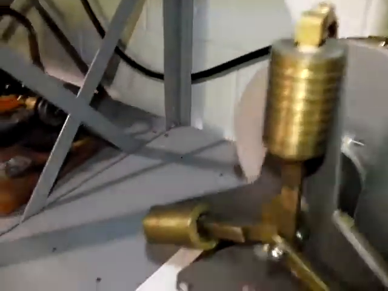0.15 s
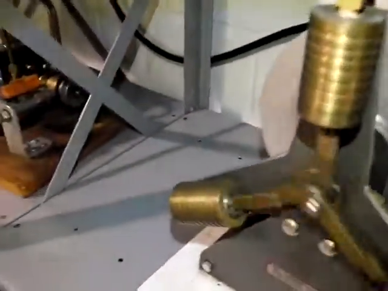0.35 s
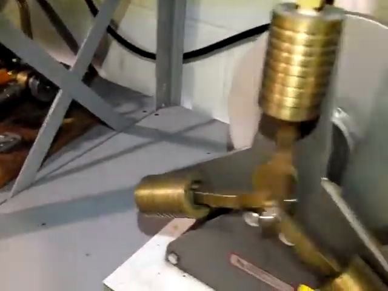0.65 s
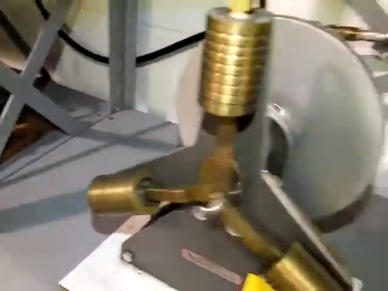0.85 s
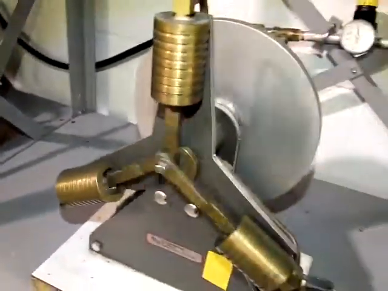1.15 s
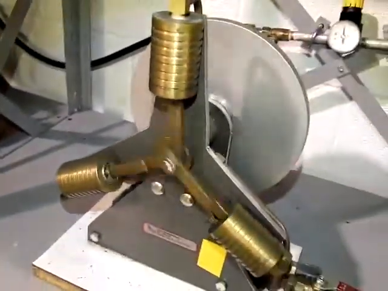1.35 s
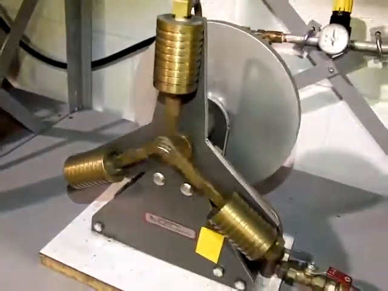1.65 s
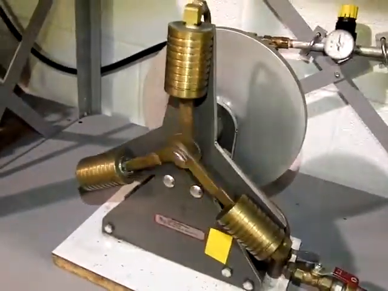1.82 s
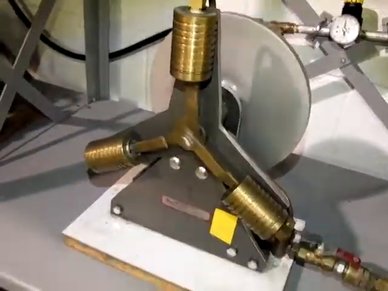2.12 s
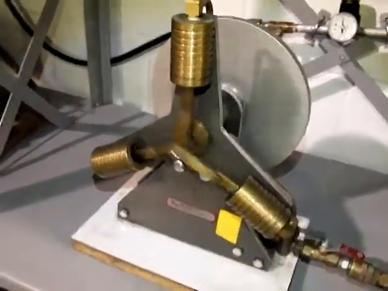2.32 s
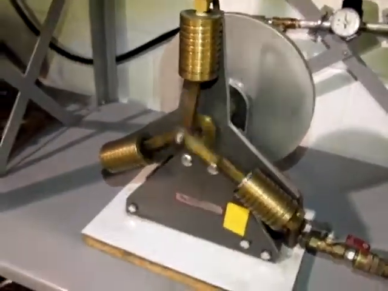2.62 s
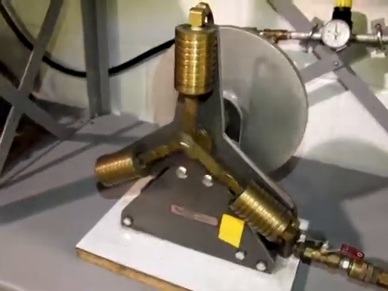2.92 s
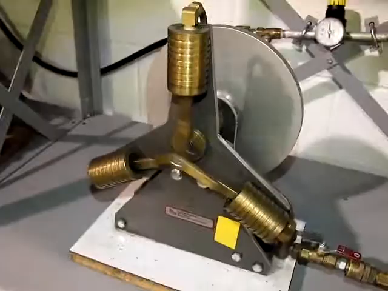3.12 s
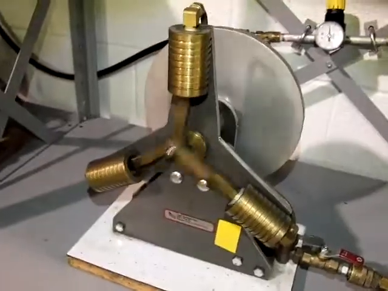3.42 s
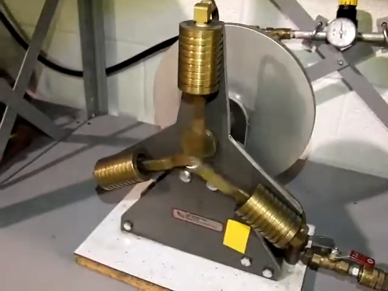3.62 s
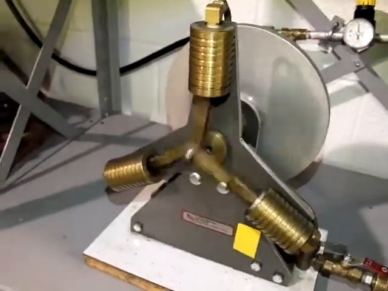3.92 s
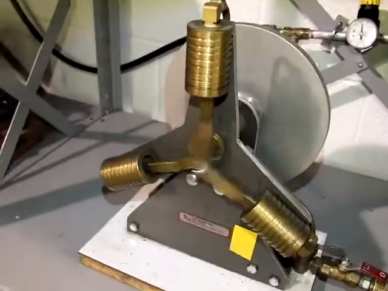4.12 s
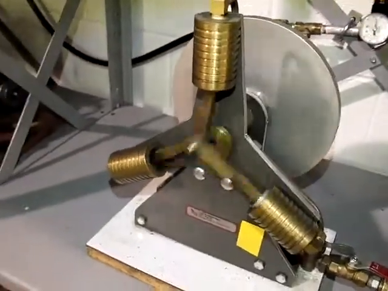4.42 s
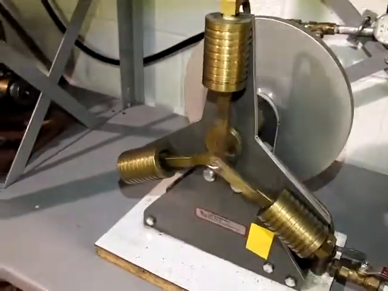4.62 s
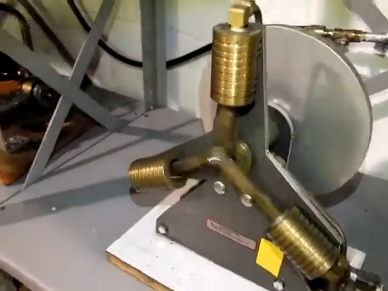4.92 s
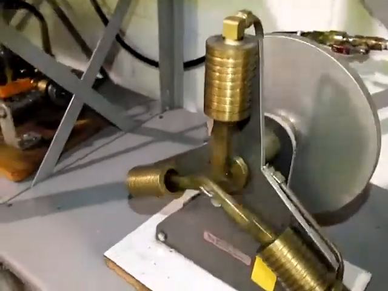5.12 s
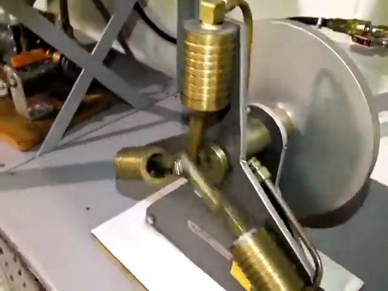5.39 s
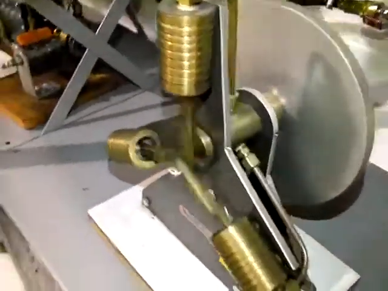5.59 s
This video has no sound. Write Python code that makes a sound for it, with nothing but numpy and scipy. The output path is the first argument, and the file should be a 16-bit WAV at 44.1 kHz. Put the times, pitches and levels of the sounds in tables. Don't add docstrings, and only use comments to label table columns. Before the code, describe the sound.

Close by, pressurised air bursts from a little engine in crisp, slightly tonal puffs, about four a second at first and eight a second by the end. Small spitting jets and leaking air fill the gaps. A short high whistle marks the start, a quick clattering knock comes midway, and an uneven low rumble strengthens later. Faint workshop hum sits behind; the handheld stereo microphone gives a bright, diffuse, phasey treble.

```python
import sys
import numpy as np
from scipy import signal
from scipy.fft import rfft, irfft, next_fast_len
from scipy.io import wavfile
from scipy.ndimage import uniform_filter1d, map_coordinates

SR = 44100
rng = np.random.default_rng(int(sys.argv[2]) if len(sys.argv) > 2 else 0)


def volts_from_db(level):
    exponent = np.asarray(level, float) / 20
    return 10 ** exponent


def file_out(sig):
    cols = np.atleast_2d(sig).T
    lim = np.clip(cols, -1, 1)
    pcm = np.round(lim * 32767).astype(np.int16)
    wavfile.write(sys.argv[1], SR, pcm)


N = 253575


def seconds():
    return np.arange(N) / SR


def tone(pitch_hz):
    return np.sin(2 * np.pi * np.cumsum(pitch_hz) / SR)


def unit(x):
    return x / np.sqrt(np.mean(x ** 2) + 1e-20)


def along(points, hz):
    f, v = np.transpose(points)
    return np.interp(np.log(hz + 1), np.log(f + 1), v)


def curves(rows):
    s, *cols = np.transpose(rows)
    return [np.interp(seconds(), s, c) for c in cols]


def wobble(rate):
    knots = rng.standard_normal(int(N * rate / SR) + 4)
    return map_coordinates(knots, [np.arange(N) * rate / SR])


def filtered(x, response):
    m = next_fast_len(N + SR // 2)
    return irfft(rfft(x, m) * response(np.fft.rfftfreq(m, 1 / SR)), m)[..., :N]


def peak(f, hz, width):
    return 1j * f * width / (hz * hz - f * f + 1j * f * width)


def swell(age, rise, fall):
    age = np.maximum(age, 0)
    return (1 - np.exp(-age / abs(rise))) ** 2 * np.exp(-age / abs(fall))


# pitch_hz, likeness (0-1)
LIKENESS = [(60, 1), (300, 0.87), (700, 0.79), (1500, 0.75), (2500, 0.62), (4000, 0.81), (8000, 0.89),
            (14000, 0.89)]


def noise(gain):
    def mid_and_side(f):
        turn = np.arccos(np.clip(along(LIKENESS, f), 0, 1)) / 2
        return gain(f) * [np.cos(turn), np.sin(turn)]

    mid, side = filtered(rng.standard_normal((2, N)), mid_and_side)
    return unit(np.array([mid + side, mid - side]))


# start_s, peak_db, port_band_db, cylinder_band_db, port_pitch_hz
MAIN_PUFFS = [(0.2301, -16.5, -4.5, -5, 1539), (0.4972, -15, -5.5, -3, 1491),
              (0.7253, -13.5, -3.5, -7, 1686), (0.9268, -17, 0, 0.5, 1323), (1.1154, -19, 0.5, -0.5, 1478),
              (1.2903, -19, 0, 0, 1378), (1.4572, -19, -2, -0.5, 1508), (1.6182, -20.5, 1, 0, 1530),
              (1.7717, -19, 1.5, -5.5, 1870), (1.924, -17, -1.5, -3.5, 1415), (2.0719, -18.5, -3, -3, 1390),
              (2.2154, -16.5, 0.5, -5, 1818), (2.3555, -21, 3, -2, 1520), (2.4938, -20, 1, 0, 1520),
              (2.6328, -19.5, 1.5, -1, 1741), (2.7676, -16, -2.5, -4.5, 1530), (2.8992, -20.5, 2, 2, 1422),
              (3.0319, -19, 0.5, -1.5, 1390), (3.163, -17.5, -1.5, 0, 1970), (3.2929, -17.5, 0, -1, 1520),
              (3.4222, -17.5, 1.5, -1, 1540), (3.5503, -17, -0.5, 0.5, 1430),
              (3.6768, -16.5, -1, -1.5, 1508), (3.8044, -15, -2.5, -4.5, 1508),
              (3.929, -17.5, 1.5, -1.5, 1504), (4.0561, -17.5, -0.5, -0.5, 1404),
              (4.181, -14.5, -5, -3.5, 1850), (4.3043, -18, 1.5, -1, 1532), (4.4278, -19, 1.5, 1, 1682),
              (4.5515, -16, -1, -1, 1870), (4.6748, -15, -3.5, -4, 1370), (4.7944, -16.5, -2, -3.5, 1510),
              (4.9187, -19.5, 1.5, 0.5, 1360), (5.0409, -16, -6, -4.5, 1520),
              (5.1622, -16.5, -9.5, -4, 1354), (5.2829, -15.5, -4, -5.5, 1383),
              (5.4052, -18.5, -1, -0.5, 1560), (5.5273, -14.5, -1, -3, 1416), (5.6481, -16, -4, -0.5, 1548)]
OUTER_PUFFS = (-0.11, 5.767)


def crank():
    times = np.concatenate([OUTER_PUFFS[:1], np.array(MAIN_PUFFS)[:, 0], OUTER_PUFFS[1:]])
    return np.interp(seconds(), times, np.arange(len(times)))


def nearest_puff(angle):
    return np.clip(np.round(angle).astype(int), 1, len(MAIN_PUFFS))


# delay_turns, rise_turns, fall_turns, gain_db
PUFF_SHAPES = [
    (-0.012, .03, .02, 22),
    (-0.0074, 0.031, 0.026, 21.5),
    (-0.02, 0.026, 0.023, 14.5),
    (-0.019, .028, 0.021, 22.5),
    (0.0072, 0.037, 0.024, 19.5),
]


def main_puffs(angle):
    _, peak_db, port_db, cylinder_db, _ = np.transpose(MAIN_PUFFS)
    parts_db = peak_db + np.array([port_db, cylinder_db, 0 * peak_db, 0 * peak_db, cylinder_db])
    nearest = nearest_puff(angle)
    return np.array([volts_from_db(db[nearest - 1] + gain_db) * swell(angle - nearest - delay, rise, fall)
                     for db, (delay, rise, fall, gain_db) in zip(parts_db, PUFF_SHAPES)])


# start_s, peak_db, port_band_db, cylinder_band_db
SLOW_PUFFS = [
    (0.051, -33, -20, -11.5),
    (0.1164, -32, 1.5, 3),
    (0.413, -29.5, -3.5, -4),
    (0.651, -31.5, -6, -3),
]


def slow_puffs():
    power = np.zeros((4, N))
    for s, db, port_db, cylinder_db in SLOW_PUFFS:
        band_db = np.array([[port_db], [cylinder_db], [-9], [0]])
        power += (volts_from_db(db + 16.5 + band_db) * swell(seconds() - s + .002, 0.0054, 0.0071)) ** 2
    return power


# angle_turns, rise_turns, fall_turns,
# port_db, cylinder_db, hiss_db, jet_db, pipe_note_db
VALVE_PUFFS = [
    (0.038, 0.046, 0.18, -28, -27, -36, -28, -44),
    (.17, 0.024, 0.012, -39, -39, -41, -27, -50),
    (0.419, 0.019, 0.078, -28.5, -48.5, -51, -43, -27.5),
    (.645, 0.013, 0.0216, -54, -37, -34, -24, -50),
    (0.788, 0.024, 0.033, -25.5, -24.5, -36, -27, -50),
    (.87, 0.066, 0.24, -33, -39.5, -44, -39.5, -50),
]
# time_s, level_db, jet_db
AIR_PRESSURE = [(0.0, -5, -1), (5.75, 1.5, 0.5)]
# port_db, cylinder_db, hiss_db, jet_db, pipe_note_db
STEADY_LEAK = (-44, -43.5, -50, -44.5, -49)


def leak_and_valve_puffs(angle):
    level_db, jet_db = curves(AIR_PRESSURE)
    pressure_db = level_db + jet_db * np.array([[0], [0], [1], [1], [0]])
    power = volts_from_db(np.array(STEADY_LEAK)[:, None] + pressure_db + 2.0 * wobble(25)) ** 2
    for at, rise, fall, *band_db in VALVE_PUFFS:
        turn, part = np.divmod(angle - at + 1, 1)
        scatter_db = 2.6 * rng.standard_normal((len(MAIN_PUFFS) + 3, len(band_db)))
        puff_db = np.array(band_db)[:, None] + scatter_db[turn.astype(int)].T + pressure_db + 5
        power += (volts_from_db(puff_db) * swell(part, rise, fall)) ** 2
    return power


# pitch_hz, level_db per Hz
AIR_COLOUR = [(700, -24), (1100, -13.5), (1500, -4.5), (2300, -4.5), (2850, -9), (3500, -1), (4400, -6.5),
              (5300, -15), (7000, -19), (9200, -17), (10700, -3.5), (11600, -9.5), (13000, -14),
              (15600, -19.5)]
BAND_SPLITS = (2910, 5560, 8900, 12670)
# pitch_hz, width_hz, boost_db
BRASS_RINGS = [(1370, 83, 4.5), (1521, 91, 5), (2400, 170, 2), (3515, 69, 3), (4190, 68, 5), (4730, 130, 7),
               (5140, 90, 9), (8120, 360, 5), (10180, 220, 4), (10810, 190, 3.5), (11500, 140, 5)]


def engine(angle):
    burst = main_puffs(angle)
    power = leak_and_valve_puffs(angle)
    power[:-1] += burst[:-1] ** 2 + slow_puffs()

    def air_bands(f):
        low1, low2, low3, low4 = [1 / (1 + (f / hz) ** 16) for hz in BAND_SPLITS]
        jet = low4 - low3
        return low1, low2 - low1, 1 - low2 - jet, jet

    air = np.zeros((2, N))
    for band in range(4):
        air += np.sqrt(power[band]) * noise(lambda f: volts_from_db(along(AIR_COLOUR, f)) * air_bands(f)[band])
    air += np.sqrt(power[-1]) * noise(lambda f: peak(f, 1940, 93) ** 2)
    air += burst[-1] * noise(lambda f: peak(f, 3418, 250) ** 2)
    port_hz = np.array(MAIN_PUFFS)[nearest_puff(angle) - 1, 4]
    air += volts_from_db(-1.5) * burst[0] * tone(port_hz)

    def brass(f):
        return 1 + sum((volts_from_db(db) - 1) * peak(f, hz, w) for hz, w, db in BRASS_RINGS)

    return volts_from_db(-2.5) * filtered(air, brass)


# time_s, low_db, middle_db, high_db, room_db
RUMBLE_AND_ROOM = [(0.0, -36, -44, -51, -49.5), (0.17, -54.5, -56, -51, -42.5), (0.26, -63, -57, -64, -51),
                   (0.42, -40.5, -41, -46, -44.5), (0.56, -55, -51, -56, -53.5),
                   (0.66, -40.5, -46, -55.5, -46), (0.75, -50, -52, -54, -50.5),
                   (0.85, -48, -49, -46.5, -46.5), (1.06, -58, -53, -55, -48), (1.17, -56, -61, -51, -49),
                   (1.65, -52, -58, -56, -48), (1.75, -55, -49, -53, -48), (2.05, -48, -54, -51.5, -46),
                   (2.21, -63, -60, -54, -46.5), (2.39, -48, -51.5, -53, -45.5), (2.58, -53, -51, -55, -45),
                   (2.67, -61, -51, -47.5, -47), (2.98, -45, -58, -41, -45.5), (3.41, -58, -42, -46, -42.5),
                   (3.54, -49, -45, -51, -41), (3.73, -45, -45.5, -47, -41.5), (4.21, -43, -45, -50.5, -44),
                   (4.36, -40, -41.5, -45, -44.5), (4.61, -49, -43.5, -44, -42.5),
                   (4.76, -43, -41.5, -51, -43.5), (5.06, -52, -39.5, -48, -43.5),
                   (5.75, -44, -35, -43, -42)]
# pitch_hz, width_hz
BENCH_SHAKES = [
    (72, 18),
    (98.5, 13.6),
    (121.5, 13.5),
]


def bench(angle):
    smooth = uniform_filter1d(angle, size=SR // 8, mode="nearest")
    orders = np.arange(6, 24)
    sizes = volts_from_db(7.5 * (orders % 3 == 0))
    shake = np.zeros(N)
    for order, size, phase in zip(orders, sizes, rng.random(len(orders))):
        shake += size * np.sin(2 * np.pi * (order * smooth + phase))
    shake = unit(shake) + 0.27 * rng.standard_normal(N) * np.sqrt(SR / 400)
    return sum(volts_from_db(db) * unit(filtered(shake, lambda f: peak(f, hz, width) ** 2))
               for db, (hz, width) in zip(curves(RUMBLE_AND_ROOM), BENCH_SHAKES))


# time_s, level_db
WHISTLE_LEVEL = [(0, -80), (.018, -72), (.026, -27.5), (.06, -38), (.1, -43), (.16, -37), (.25, -59)]


def whistle():
    pitch_hz = 3480 + 8 * wobble(55)
    return volts_from_db(curves(WHISTLE_LEVEL)[0] + 5.5 + 1.5 * wobble(82)) * tone(pitch_hz)


# start_s, peak_db, pitch_hz
KNOCKS = [
    (2.6627, -16, 2000),
    (2.669, -18.5, 565),
    (2.676, -20, 1020),
    (2.681, -19, 2130),
]
# pitch_hz, level_db per Hz
SCRAPE_COLOUR = [(120, -45), (200, -10), (1030, -3.5), (1540, -20), (2010, 2.5), (2520, -2.5), (2900, -21),
                 (3520, -8), (9000, -35), (11700, -70), (19800, -120)]


def rattle():
    t = seconds()
    scrape = noise(lambda f: volts_from_db(along(SCRAPE_COLOUR, f)))
    knocks = volts_from_db(-23) * swell(t - KNOCKS[0][0], 0.01, 0.023) * scrape
    for s, db, hz in KNOCKS:
        ring = 0.77 * np.sin(2 * np.pi * hz * (t - s))
        knocks += volts_from_db(db + 5) * swell(t - s + 0.00057, 0.00064, 0.0026) * (scrape + ring)
    return knocks


# pitch_hz, level_db per Hz
ROOM_COLOUR = [(12, -38), (20, -4), (102, 4), (205, -8.5), (307, -7), (356, -7.5), (412, -13.5),
               (513, -8.5), (688, -8.5), (940, -12.5), (1220, -14.5), (1360, -3), (1600, -10), (2080, -48),
               (3520, -120)]
# pitch_hz, width_hz, boost_db
ROOM_BOOSTS = [(305, 12.6, 3.5), (520, 70, 6), (668.3, 18, 9.5), (798, 55, 7.5)]
# pitch_hz, level_db
MAINS_HUM = [(360.7, -51)]


def workshop():
    def colour(f):
        boosts = 1 + sum((volts_from_db(db) - 1) * abs(peak(f, hz, w)) ** 2 for hz, w, db in ROOM_BOOSTS)
        return volts_from_db(along(ROOM_COLOUR, f)) * boosts

    room = volts_from_db(curves(RUMBLE_AND_ROOM)[-1] + 4.5 + 1.42 * wobble(12)) * noise(colour)
    hum_hz, hum_db = MAINS_HUM[0]
    hum = volts_from_db(hum_db + 3 + 1.1 * wobble(6.8)) * np.sin(2 * np.pi * hum_hz * seconds())
    return room + hum


def scene():
    angle = crank()
    return engine(angle) + bench(angle) + whistle() + rattle() + workshop()


def band_limit(x):
    return signal.sosfilt(signal.butter(12, 15820, fs=SR, output="sos"), x)


# pitch_hz, lead_radians
PORT_LEAD = [(0, -0.5), (600, -0.66), (1210, -1.47), (1460, -0.9), (2070, -2.5), (3270, -2.5), (4050, -3),
             (4390, -2.5), (6200, -2.5), (8180, -2.5), (8530, -2.5), (11300, -3), (12200, -2.5),
             (15400, -2.5)]
# pitch_hz, difference_db
PORT_TILT = [(60, -1.5), (110, 0.5), (200, 0.5), (380, 0.5), (700, 1.0), (1290, 1), (2380, -4), (4400, 0),
             (8120, -3.5), (15000, 0.5)]
# pitch_hz, width_hz, depth (0-1)
HOUSING_NOTCHES = [(2893, 206, 0.86), (5000, 150, .85)]


def record(dry):
    half = np.array([[.5], [-.5]])

    def microphone(f):
        lead = np.exp(1j * half * np.interp(f, *np.transpose(PORT_LEAD)))
        housing = np.prod([1 - depth * peak(f, hz, w) for hz, w, depth in HOUSING_NOTCHES], axis=0)
        return volts_from_db(half * along(PORT_TILT, f)) * lead * housing * (f < 15800)

    mix = np.clip(filtered(dry, microphone), -1, 1)
    return band_limit(mix)


dry = scene()
out = record(dry)
file_out(out)
```